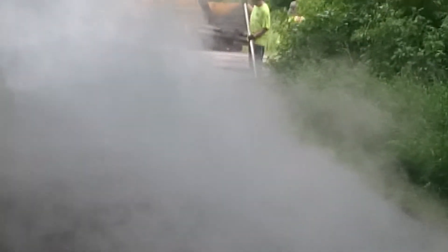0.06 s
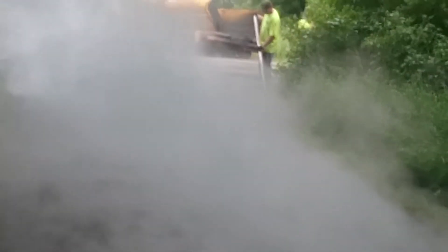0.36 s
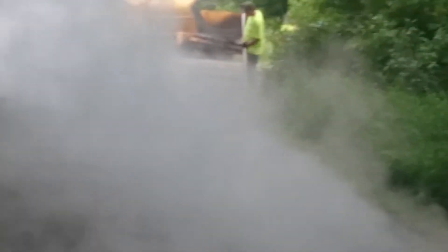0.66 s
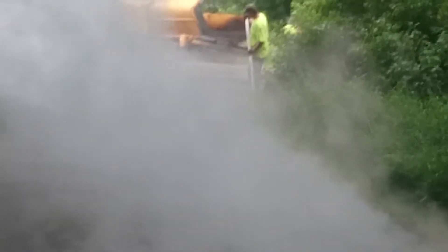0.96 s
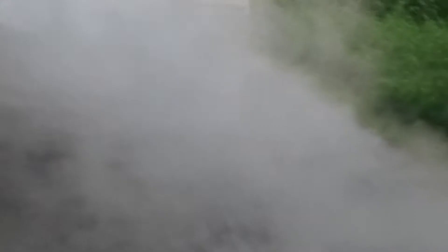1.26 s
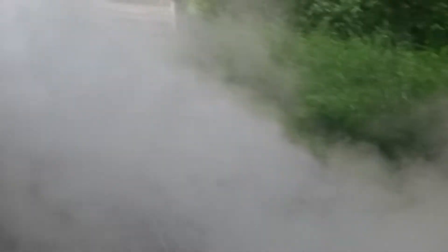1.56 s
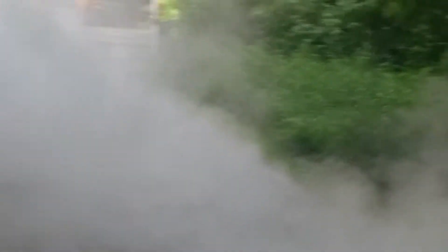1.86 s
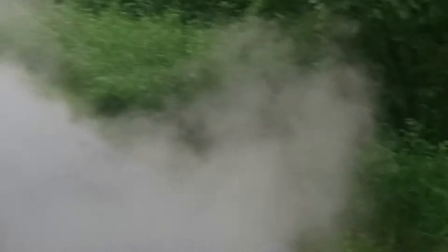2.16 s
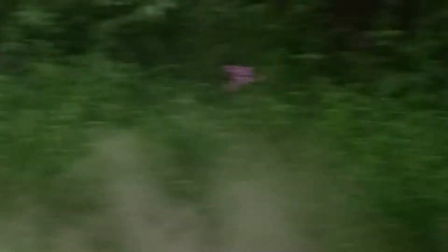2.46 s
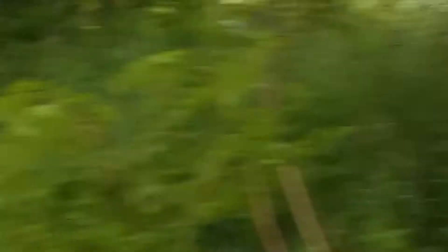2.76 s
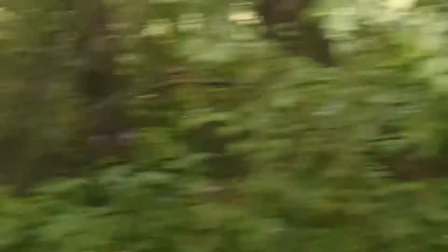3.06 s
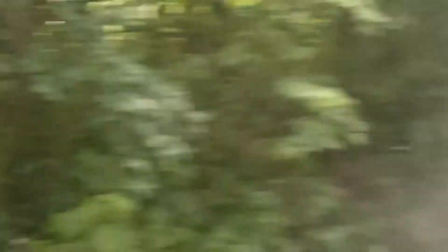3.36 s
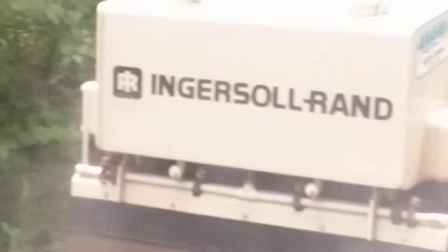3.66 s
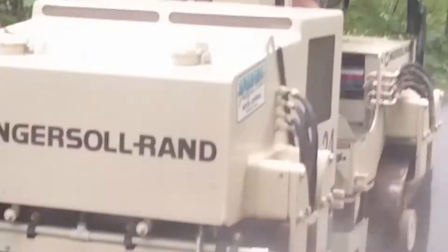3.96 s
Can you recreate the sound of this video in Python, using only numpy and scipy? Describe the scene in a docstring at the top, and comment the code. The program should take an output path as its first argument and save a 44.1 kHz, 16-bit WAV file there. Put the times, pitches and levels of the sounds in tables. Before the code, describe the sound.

Paving machinery runs outdoors with a deep, even diesel drone, rattling and knocking under a constant hiss. The engine sits somewhat to the right, and its tone changes as the microphone turns from the road to the roller.

```python
"""A deep diesel drone, with a broad hiss all around: paving machinery on a steaming road between trees.
The engine holds about 2400 rpm; three firings a cycle make the exhaust note. Valve clatter, ringing
steel panels and one knock repeat each cycle, over fan rush, pump and gear whine and a swelling hum.
The listener turns from the road past the trees to a roller, so the engine's timbre and direction shift."""
import sys
import numpy as np
from scipy.fft import rfft, irfft, next_fast_len
from scipy.io import wavfile
from scipy.ndimage import map_coordinates

SR = 44100
rng = np.random.default_rng(int(sys.argv[2]) if len(sys.argv) > 2 else 0)


def wav_out(sig):
    """Save sig, one row per channel (or a flat mono array), as 16-bit PCM at SR to the path in sys.argv[1]."""
    wavfile.write(sys.argv[1], SR, np.round(np.clip(np.atleast_2d(sig).T, -1, 1) * 32767).astype(np.int16))


N = 176400
FIRINGS_PER_CYCLE = 3
KNOCK_AT_CYCLES = .4


def amp(db):
    """Decibels to gain."""
    return 10 ** (np.asarray(db) / 20)


def curves(rows):
    """Each column after the time, one value per sample."""
    times_s, *columns = np.transpose(rows)
    return [np.interp(np.arange(N) / SR, times_s, column) for column in columns]


def spectra(rows, hz):
    """Each column after the frequency, read on a log axis."""
    knots_hz, *columns = np.transpose(rows)
    return np.array([np.interp(np.log(hz + 1), np.log(knots_hz + 1), column) for column in columns])


def wobble(rate_hz):
    """Smooth random curve, rate_hz knots a second."""
    knots = rng.standard_normal(int(N * rate_hz / SR) + 4)
    return map_coordinates(knots, [np.arange(N) * rate_hz / SR + 1])


def filtered(x, response):
    """Apply a frequency response to x."""
    size = next_fast_len(N + SR // 2)
    return irfft(rfft(x, size) * response(np.fft.rfftfreq(size, 1 / SR)), size)[..., :N]


def lowpass(hz, corner_hz, order):
    """Zero-phase low-pass gain."""
    return 1 / (1 + (hz / corner_hz) ** order)


def noise(rows, channels):
    """Noise for each column of spectral densities."""
    white = rng.standard_normal((channels, N))
    return filtered(white, lambda hz: amp(spectra(rows, hz)) * np.sqrt(SR / 2))


def sine(cycles, rms_db):
    """Sine with a random start phase."""
    return np.sqrt(2) * amp(rms_db) * np.sin(2 * np.pi * (cycles + rng.random()))


def blend(views, facing):
    """Cross-fade between directions; the last one holds."""
    position = np.minimum(facing, len(views) - 1)
    return sum(view * np.maximum(1 - abs(position - k), 0) for k, view in enumerate(views))


def shaft_lines(rows, cycles, facing, waver_db, drift_cycles, rate_hz):
    """Sines at the nearest whole multiples of the cycle rate; all but the firing note waver."""
    out = np.zeros(N)
    for order, *levels_db in rows:
        wavers = round(order) != FIRINGS_PER_CYCLE
        phase = round(order) * cycles + wavers * drift_cycles * wobble(rate_hz)
        level_db = blend(levels_db, facing) + wavers * waver_db * wobble(rate_hz)
        out += sine(phase, level_db)
    return out


# Exhaust lines: multiple of cycle rate, level/dB facing road, level/dB turned away
EXHAUST_LINES_DB = [(2, -57, -57), (3, -16.5, -16), (4, -38, -41), (5, -61.5, -48), (7, -44.5, -55),
                    (8, -51, -47), (10, -50, -48), (11, -42, -48.5), (13, -42.5, -47.5), (14, -40, -46),
                    (15, -61, -50.5), (16, -47, -48), (17, -46, -58.5), (18, -48, -58), (19, -49, -49),
                    (20, -45, -72), (21, -60, -52), (23, -43, -49), (24, -43, -55.5), (25, -43.5, -62)]
# Firing-note harmonics: t/s, level/dB of 2nd, 3rd, 4th
FIRING_HARMONICS_DB = [(0, -30.5, -36, -35), (.5, -37.5, -33, -32.5), (1.1, -44, -36, -30.5),
                       (1.7, -32.5, -38, -29), (2.3, -29, -39, -32), (2.8, -27.5, -42.5, -36),
                       (3.4, -27, -45.5, -41), (4, -25.5, -46.5, -58)]

def exhaust(cycles, facing):
    """Firing note, its swelling harmonics and weaker lines from unequal cylinders."""
    harmonics = sum(sine(k * FIRINGS_PER_CYCLE * cycles, level_db)
                    for k, level_db in enumerate(curves(FIRING_HARMONICS_DB), start=2))
    lines = shaft_lines(EXHAUST_LINES_DB, cycles, facing, waver_db=1.94, drift_cycles=.018, rate_hz=4.97)
    return harmonics + lines


# Hiss spectrum: f/Hz, density/(dB per Hz) left, right
HISS_DENSITY_DB = [(100, -78, -84), (500, -78, -79), (1000, -76.5, -76), (1510, -75.5, -71.5),
                   (2050, -83.5, -76.5), (3050, -79.5, -71.5), (3360, -75.5, -78.5), (4120, -76, -76.5),
                   (5000, -79.5, -75.5), (5500, -82.5, -73.5), (6270, -84.5, -75), (7340, -89.5, -83.5),
                   (8500, -87, -87.5), (10000, -89, -86), (11400, -89.5, -83), (13200, -97, -82.5),
                   (14000, -97, -88.5), (15500, -94, -88.5)]
# Hiss swell: t/s, gain/dB left, right
HISS_GAIN_DB = [(0, -0.5, 0), (1.4, 1, 0), (1.9, 3, .5), (2.25, 0.5, 0.5), (2.55, -0.5, -2), (2.8, 0, -1.5),
                (2.95, 1, -0.5), (3.4, 1, 0), (4, 1, -1)]
# Hiss treble: t/s, gain/dB
HISS_TREBLE_DB = [(0, 1), (.7, 1), (1.6, -1), (2.2, 1), (2.6, 0), (2.95, 3), (3.25, 0), (3.55, 0), (4, -1)]

def hiss(flutter_db=.75, treble_hz=8000):
    """Fluttering hiss from all sides, independent left and right; its treble swells separately."""
    whole = noise(HISS_DENSITY_DB, channels=2)
    whole *= amp(np.array(curves(HISS_GAIN_DB)) + flutter_db * wobble(rate_hz=30))
    low = filtered(whole, lambda hz: lowpass(hz, treble_hz, order=12))
    return low + (whole - low) * amp(curves(HISS_TREBLE_DB)[0])


# Clatter spectrum: f/Hz, level/dB per line facing road, trees, roller
CLATTER_LINES_DB = [(527, -52, -47, -55), (590, -53, -56, -60.5), (634, -45.5, -50, -51),
                    (810, -53.5, -77, -59), (905, -51, -61, -54.5), (1050, -58, -60, -60),
                    (1170, -55, -62, -58), (1320, -48, -75, -54), (1800, -54, -52, -57.5),
                    (1980, -57, -67, -59), (2400, -64, -59, -57.5), (2900, -67.5, -60.5, -63.5),
                    (3460, -67.5, -62, -67), (4790, -68, -68, -77)]

def clatter(cycles, facing, cycle_hz, shifting_share=.47, size=4096):
    """Valves and injectors repeat one dense, slowly changing pattern each cycle."""
    hz = np.arange(size // 2 + 1) * cycle_hz
    magnitudes = amp(spectra(CLATTER_LINES_DB, hz)) * ((hz > 510) & (hz < 5200))

    def pattern():
        phases = np.exp(2j * np.pi * rng.random(len(hz)))
        shapes = irfft(magnitudes * phases) * size / np.sqrt(2)
        return blend([np.interp(cycles % 1 * size, np.arange(size), shape) for shape in shapes], facing)

    shifting = sum(wobble(rate_hz=5) * pattern() for _ in range(4)) / 2
    return np.sqrt(1 - shifting_share) * pattern() + np.sqrt(shifting_share) * shifting


# Panel modes: f/Hz, width/Hz, level/dB facing road, trees, roller
PANEL_MODES = [(1059, 54, -57.5, -39.5, -50), (1454, 82, -43, -49, -47), (1674, 44, -42, -53, -49),
               (1802, 85, -44.5, -55, -47.5), (2216, 81, -49.5, -45, -51), (2406, 90, -47.5, -50, -55),
               (2898, 83, -57, -52, -50.5), (3100, 30, -61.5, -47, -49), (4080, 190, -57.5, -48, -51),
               (6230, 300, -59, -78, -53)]

def panels(cycles, facing, locked_share=.57, shake_depth=.35, size=2048):
    """The engine shakes steel panels, partly alike each cycle, partly at random."""
    pattern = irfft(np.exp(2j * np.pi * rng.random(size // 2 + 1))) * np.sqrt(size)
    locked = pattern[(cycles % 1 * size).astype(int)]
    drive = np.sqrt(locked_share) * locked + np.sqrt(1 - locked_share) * rng.standard_normal(N)
    drive *= 1 + shake_depth * np.cos(2 * np.pi * (cycles - KNOCK_AT_CYCLES))
    out = np.zeros(N)
    for mode_hz, width_hz, *levels_db in PANEL_MODES:
        def resonance(hz):
            damping = 2j * hz * width_hz
            return (damping / (mode_hz ** 2 - hz ** 2 + damping)) ** 2
        ring = filtered(drive, resonance)
        out += ring / ring.std() * amp(blend(levels_db, facing))
    return out


# Rush spectrum: f/Hz, density/(dB per Hz) facing road, turned away
RUSH_DENSITY_DB = [(12, -76, -76), (40, -64, -66), (99, -58.5, -63), (158, -69, -74), (274, -63, -68),
                   (450, -68.5, -72.5), (590, -74.5, -80.5), (1020, -66, -85), (1450, -74, -81),
                   (1860, -72, -78.5), (2540, -83.5, -78), (4170, -83, -84), (8000, -105, -105)]

def rush(cycles, facing, throb_depth=.38):
    """Exhaust and fan noise throbs with the firings."""
    throb = 1 + throb_depth * np.cos(2 * np.pi * FIRINGS_PER_CYCLE * cycles)
    return blend(noise(RUSH_DENSITY_DB, channels=1), facing) * throb


# Whine lines: multiple of cycle rate (rounded in use), level/dB facing road, trees, roller
WHINE_LINES_DB = [(32, -46, -47, -46.5), (41, -60, -52, -57), (44, -48.5, -42, -50.5), (52, -54, -50, -56),
                  (54, -45.5, -56, -54), (72.67, -42.5, -55, -49.5), (73, -51, -56, -59),
                  (74, -48.5, -56, -56), (83.8, -48.5, -50, -57), (89.4, -52, -49, -46),
                  (119.7, -53, -66, -53), (143.4, -56, -49, -50.5)]

def gear_whine(cycles, facing):
    """Gears and pumps sound wavering lines tied to the shaft."""
    return shaft_lines(WHINE_LINES_DB, cycles, facing, waver_db=2.4, drift_cycles=.13, rate_hz=6)


# Knock: t/s, level/dB, ring f/Hz
KNOCK_TRACK = [(0, -41, 720), (.7, -47, 645), (1.1, -29.5, 656), (2.2, -32, 657), (2.65, -33, 704),
               (3.1, -40, 719), (3.35, -32.5, 709), (3.8, -26, 693), (4, -40, 682)]

def knock(cycles, cycle_hz, t60_s=.1, attack_s=.00092, scatter_db=1.5, scatter_s=.00012):
    """One blow a cycle rings a panel; strength and phase scatter from blow to blow."""
    level_db, ring_hz = curves(KNOCK_TRACK)
    blow, cycles_since = np.divmod(cycles + 1 - KNOCK_AT_CYCLES, 1)
    draws = rng.standard_normal((int(blow[-1]) + 1, 2))
    strength, lateness = draws[blow.astype(int)].T
    age_s = cycles_since / cycle_hz
    envelope = np.exp(-np.log(1000) * age_s / t60_s) * (1 - np.exp(-age_s / attack_s))
    ring = np.sin(2 * np.pi * ring_hz * (age_s - scatter_s * lateness))
    return amp(level_db + scatter_db * strength) * envelope * ring


# Pump whine: t/s, level/dB
PUMP_LEVEL_DB = [(0, -45), (.5, -52), (1.6, -49), (2.1, -48.5), (2.6, -42), (3.1, -43), (3.4, -41),
                 (3.75, -46), (4, -51)]

def pump_whine(cycles, order=36, drift_cycles=.022):
    """Clean shaft-locked whine, perhaps a hydraulic pump; loudest during the turn."""
    return sine(order * cycles + drift_cycles * wobble(rate_hz=4), curves(PUMP_LEVEL_DB)[0])


# Hum: t/s, f/Hz, level/dB
HUM_TRACK = [(0, 444.4, -44.5), (.7, 441.8, -36.5), (1.2, 444, -45), (2.0, 443, -52), (2.4, 440.4, -43),
             (2.8, 439, -38.5), (3.05, 435, -41.5), (3.4, 438, -45.5), (4, 442, -51)]

def hum():
    """A mid hum swells twice, sagging a little in pitch."""
    hz, level_db = curves(HUM_TRACK)
    return sine(np.cumsum(hz) / SR, level_db)


# Clatter, panels, rush and whine together: t/s, gain/dB
MACHINERY_GAIN_DB = [(0, 4), (.25, 1.5), (.5, 0.5), (.9, 0), (1.4, -2.5), (2, 0), (2.5, 2), (2.9, -2),
                     (3.2, -1), (3.5, -0.5), (4, 1.5)]
# Their middle band: t/s, gain/dB
MID_GAIN_DB = [(0, -1), (.7, -2.5), (1.1, 3), (1.5, 3.5), (1.95, 3), (2.4, -3), (2.75, -3.5), (3.1, 0.5),
               (3.5, -1), (4, 2)]

def swell(machinery, low_hz=850, high_hz=1880):
    """Overall level and middle band rise and fall as the listener turns."""
    whole = machinery * amp(curves(MACHINERY_GAIN_DB)[0])
    middle = filtered(whole, lambda hz: lowpass(hz, high_hz, order=8) - lowpass(hz, low_hz, order=8))
    return whole + middle * (amp(curves(MID_GAIN_DB)[0]) - 1)


# Engine arrival, left behind right: t/s, lag/ms
LEFT_LAG_MS = [(0, .35), (1.0, 0.33), (2.1, 0.31), (2.45, 0.39), (2.8, 0.36), (3.1, 0.29), (3.3, 0.13),
               (3.5, -0.039), (4, -0.13)]
# Engine balance, left minus right: f/Hz, level/dB
LEFT_BALANCE_DB = [(60, -8.3), (120, -5.8), (240, -6), (700, -6.5), (1300, -10.5), (2400, -10), (4400, -4)]

def direction(engine, fade_s=.0024):
    """The engine is weaker on the left, arriving there late at first and early after the turn."""
    def balance(hz):
        ratio = amp(spectra(LEFT_BALANCE_DB, hz)[0])
        return np.array([ratio, np.ones_like(ratio)]) * np.sqrt(2 / (1 + ratio ** 2))

    lag_samples = curves(LEFT_LAG_MS)[0] * SR / 1000
    n = np.arange(N)
    pair = [map_coordinates(engine, [n + side * lag_samples / 2], mode="nearest") for side in (-1, 1)]
    edge_fade = np.minimum(np.minimum(n, n[::-1]) / (fade_s * SR), 1)
    return filtered(np.array(pair) * edge_fade, balance)


# Engine cycle rate, two revolutions a cycle: t/s, f/Hz
CYCLE_RATE_HZ = [(0, 20.08), (.6, 20.08), (1.2, 20.025), (2.2, 20.005), (4, 20.01)]
# Listener's turn: t/s, direction (0 road, 1 trees, 2 roller)
FACING = [(0, 0.015), (1.9, 0.19), (2.4, 0.4), (2.8, 0.46), (3.0, 1), (3.22, 1.22), (3.45, 2), (4, 2.07)]

def scene():
    """One shaft times every engine layer but the hum; the hiss surrounds them."""
    cycles = np.cumsum(curves(CYCLE_RATE_HZ)[0]) / SR
    cycle_hz = CYCLE_RATE_HZ[-1][1]
    facing = np.clip(curves(FACING)[0], 0, 2)
    machinery = gear_whine(cycles, facing) + clatter(cycles, facing, cycle_hz)
    machinery += panels(cycles, facing) + rush(cycles, facing)
    engine = exhaust(cycles, facing) + swell(machinery)
    engine += knock(cycles, cycle_hz) + pump_whine(cycles) + hum()
    return direction(engine) + hiss()


def record(dry, top_hz=15700):
    """Cut everything above top_hz."""
    return filtered(dry, lambda hz: hz < top_hz)


dry = scene()
out = record(dry)
wav_out(out)
```